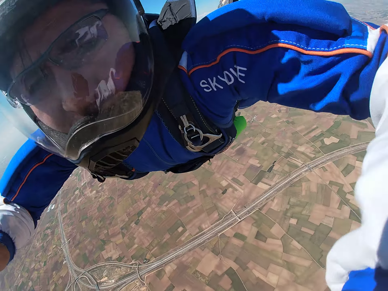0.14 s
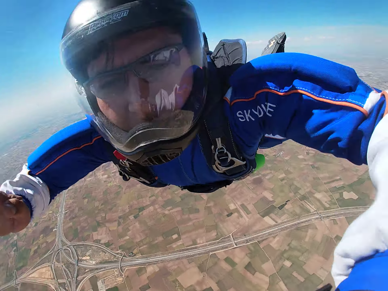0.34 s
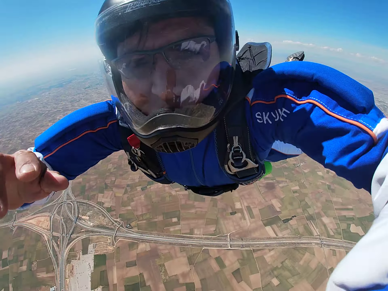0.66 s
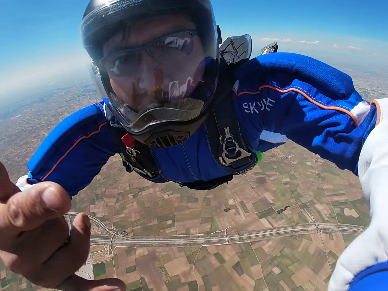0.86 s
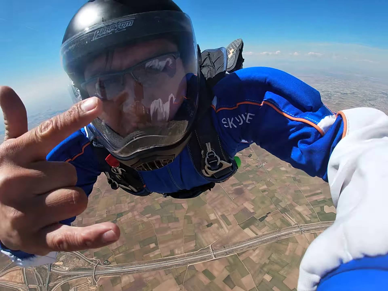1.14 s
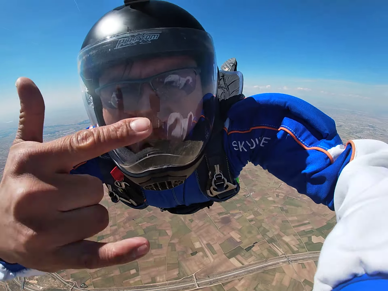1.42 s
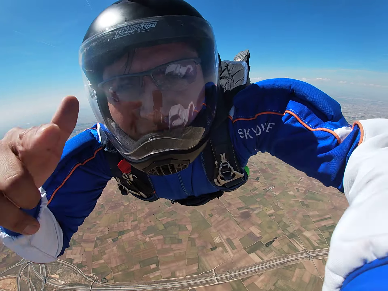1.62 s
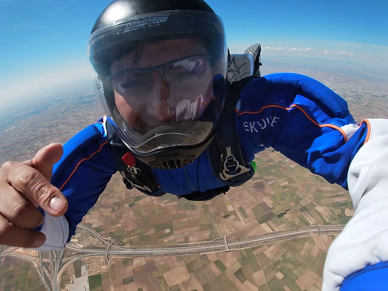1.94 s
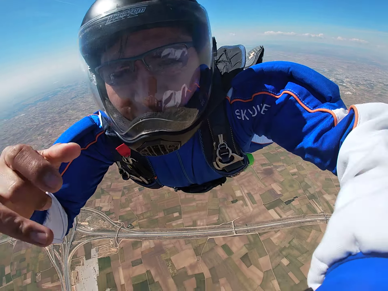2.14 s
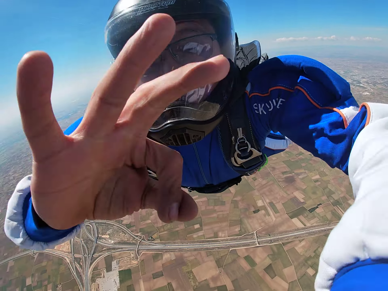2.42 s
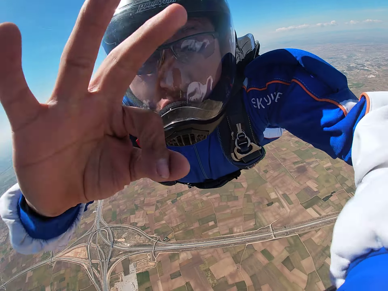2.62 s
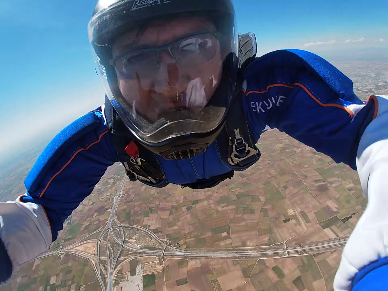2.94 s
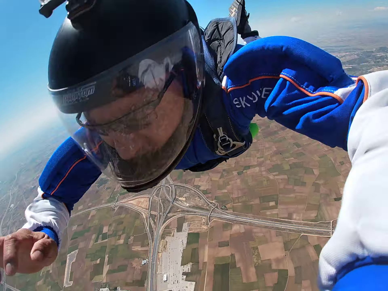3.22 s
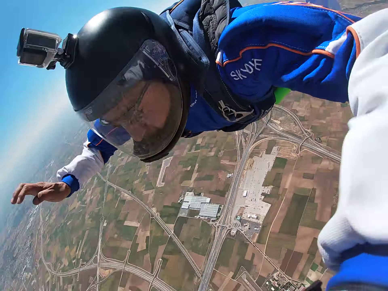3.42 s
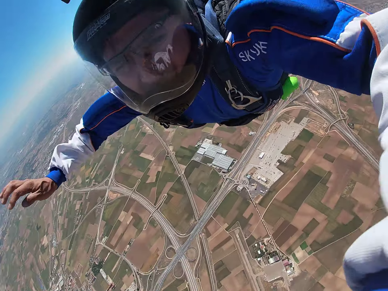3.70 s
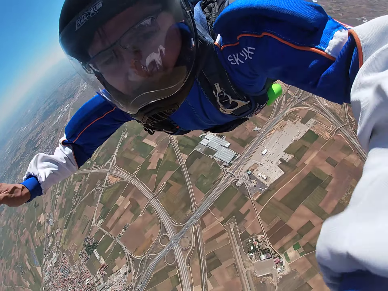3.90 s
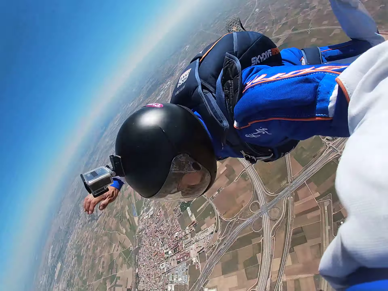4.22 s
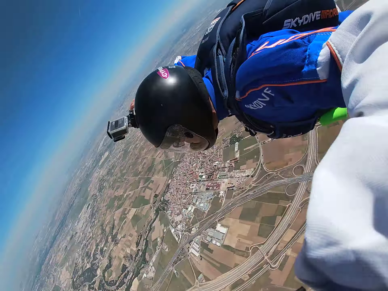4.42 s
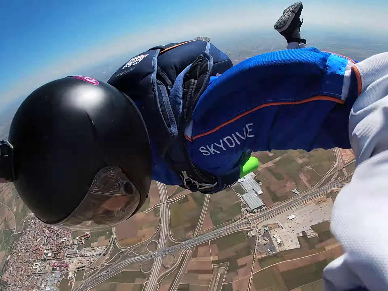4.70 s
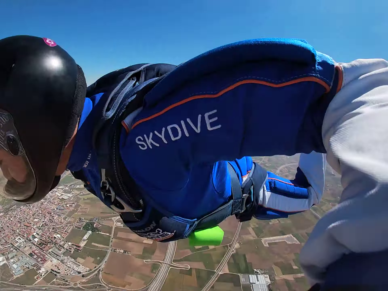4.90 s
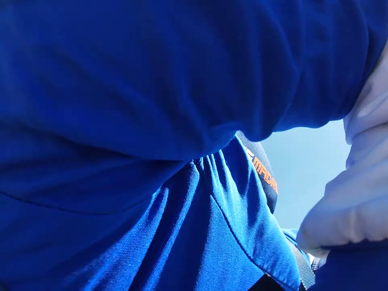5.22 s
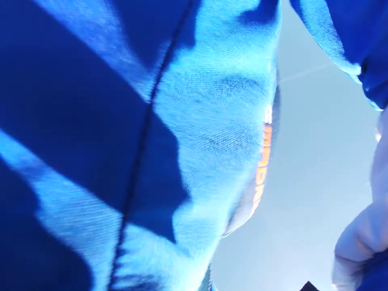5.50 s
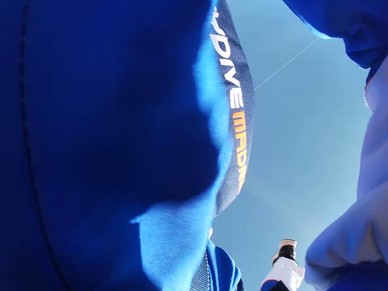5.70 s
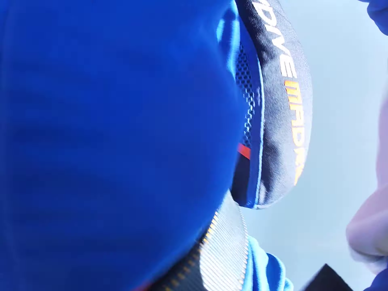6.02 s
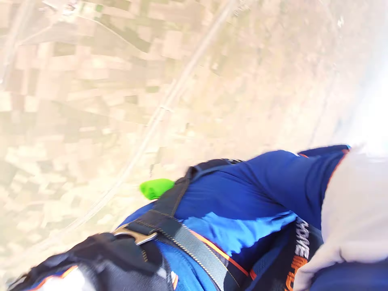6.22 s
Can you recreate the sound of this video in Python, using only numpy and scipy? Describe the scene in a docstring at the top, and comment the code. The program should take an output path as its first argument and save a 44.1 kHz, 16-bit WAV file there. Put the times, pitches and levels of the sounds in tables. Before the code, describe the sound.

Continuous loud freefall wind, close and without echo: deep thumping buffets, a mid roar and a thin hiss. Loose sleeve cloth whips beside the microphone in a rapid motor-like flutter, with clusters of snaps strongest in the first half. Later there are fewer and weaker snaps, the flutter dies, and dull, grainy gusts swell and ebb.

```python
"""Freefall, heard from a microphone worn on a skydiver's wrist.
From the start the airstream buffets the microphone: noise in bands, from slow heaves to fine hiss.
Right beside it a jumpsuit sleeve flutters about sixty times a second; each flap is a push of air
(low tones) and a rasp (bursts of noise), and many flaps add a snap, faint to hard.
Late on the body rolls over; then the flutter dies and a smoother, muffled surge of air swells and ebbs."""
import sys
import numpy as np
from scipy import signal
from scipy.fft import rfft, irfft
from scipy.io import wavfile
from scipy.ndimage import uniform_filter1d, minimum_filter1d

SR = 44100
rng = np.random.default_rng(int(sys.argv[2]) if len(sys.argv) > 2 else 0)


def generate_wav(sig):
    """Save sig (samples, or channels by samples) to the path in sys.argv[1] as 16-bit PCM at SR."""
    pcm = np.round(np.clip(np.atleast_2d(sig).T, -1, 1) * 32767).astype(np.int16)
    wavfile.write(sys.argv[1], SR, pcm)


N = 280029
TIME = np.arange(N) / SR

# pressure swing of the sleeve, before each tone's trim: t/s, fundamental level/dB, octave level/dB
THROB = [(0.0, -15.5, -45), (0.18, -30, -17.5), (0.4, -25.5, -24), (0.62, -14, -21.5), (0.78, -29, -37),
         (0.92, -17, -16.5), (1.1, -26, -27.5), (1.3, -29, -20), (1.45, -25, -24), (1.6, -23, -28),
         (1.77, -33, -33), (1.93, -19, -15.5), (2.1, -33, -40), (2.3, -18, -17.5), (2.42, -25, -25),
         (2.62, -19, -17.5), (2.78, -16.5, -25), (2.95, -20, -18), (3.15, -23, -14.5), (3.35, -15, -25),
         (3.47, -28, -35), (3.62, -19.5, -26.5), (3.76, -19, -19), (3.9, -13.5, -23), (4.05, -18, -25),
         (4.2, -24, -21.5), (4.35, -15, -28), (4.55, -16, -27), (4.92, -19.5, -23.5), (5.05, -29, -23)]
# flaps with an added snap, faint to hard, often several in a row: t/s (just ahead of the crest), level/dB
SNAPS = [(0.145, -30), (0.544, -26), (0.587, -30), (0.635, -24), (0.652, -29), (0.697, -19), (0.808, -24),
         (0.902, -23.5), (0.924, -23), (0.983, -30), (1.109, -23), (1.229, -20.5), (1.292, -19.5),
         (1.305, -23), (1.368, -18), (1.427, -28), (1.474, -24), (1.564, -25), (1.625, -27), (1.686, -17),
         (1.763, -20), (1.839, -20), (1.904, -16.5), (2.01, -24), (2.102, -19.5), (2.221, -16.5),
         (2.299, -17.5), (2.44, -23.5), (2.471, -22), (2.533, -23), (2.577, -27), (2.608, -21.5),
         (2.704, -27), (2.734, -19), (2.764, -17), (2.813, -23.5), (2.859, -22), (2.891, -18.5),
         (2.955, -24), (3.031, -28), (3.064, -25.5), (3.171, -25), (3.25, -23.5), (3.298, -23.5),
         (3.329, -23), (3.377, -19.5), (3.457, -23), (3.564, -33), (3.596, -25), (3.666, -21.5),
         (3.774, -28), (4.344, -34), (4.381, -30), (4.471, -42), (4.56, -37), (4.681, -30), (4.748, -27),
         (4.796, -21.5), (4.827, -24), (4.844, -24), (4.874, -26), (4.941, -29), (5.003, -37),
         (5.054, -28.5), (5.09, -38), (5.141, -41), (5.234, -21)]
SNAP_DELAY_S = 0.0032   # from the listed time of a snap to its crest
# spells of flapping, from loose to clean: start t/s, end t/s, pulsed share (0-1),
# unevenness/dB (before scaling)
SPELLS = [(-.04, 0.12, 0.7, 0), (0.5, 1.114, 0.83, 1), (1.114, 1.378, 0.75, 4.5), (1.386, 1.72, 0.91, 2.5),
          (1.722, 2.537, 0.8, 2.5), (2.544, 2.848, 0.92, 1.5), (2.849, 2.935, 0.55, 1.5),
          (2.926, 3.36, 0.89, 2), (3.36, 3.851, 0.76, 2.5), (4.197, 4.63, 0.98, 1), (4.631, 4.782, 0.8, 1),
          (4.778, 4.913, 0.6, 2.5), (4.911, 4.993, 0.6, 0.5), (4.998, 5.169, 0.92, 2.5)]


def from_db(db):
    """Decibels to gain."""
    return 10 ** (np.asarray(db) / 20)


def rms_one(x):
    """Scale to unit power."""
    return x / np.sqrt(np.mean(x ** 2) + 1e-20)


def in_time(rows):
    """Each column of a curve, at every sample."""
    s, *columns = np.transpose(rows)
    return [np.interp(TIME, s, column) for column in columns]


def bump(s, span_s):
    """A smooth swell of height 1 around time s, with half length span_s."""
    first, last = np.searchsorted(TIME, [s - span_s, s + span_s])
    out = np.zeros(N)
    out[first:last] = (1 - ((TIME[first:last] - s) / span_s) ** 2) ** 2
    return out


def coloured(x, spectrum):
    """Give a signal a spectrum, drawn in dB over log frequency; rms 1."""
    hz, db = np.transpose(spectrum)
    bins_hz = np.maximum(np.arange(N // 2 + 1) * SR / N, 1)
    gain_db = np.interp(np.log(bins_hz), np.log(hz), db, left=-80, right=-100)
    return rms_one(irfft(rfft(x) * from_db(gain_db), N))


def steadied(x, steady_s):
    """Even out the power over spans longer than steady_s; rms about 1."""
    span = max(int(steady_s * SR), 2)
    power = uniform_filter1d(uniform_filter1d(x ** 2, span), span)
    return x / np.sqrt(power + 1e-9)


def drift(rate_hz):
    """Chance wandering with a spread of 1, little of it faster than rate_hz."""
    bins_hz = np.arange(N // 2 + 1) * SR / N
    return rms_one(irfft(rfft(rng.standard_normal(N)) / (1 + (bins_hz / rate_hz) ** 4), N))


def turbulence(spectrum, steady_s):
    """Coloured noise whose power holds steady over spans longer than steady_s."""
    return steadied(coloured(rng.standard_normal(N), spectrum), steady_s)


def wind_level(law):
    """Level in dB of one size of turbulence, from the force of the wind and the roll of the body."""
    # force of the airstream at the wrist: t/s, level/dB
    wind = [(0.0, -1.5), (0.35, -2.5), (0.55, 1), (0.86, -1.5), (1.5, 0.5), (1.95, 3), (2.32, 2.5),
            (2.41, 0), (3.3, -1.5), (3.54, -6), (3.8, -1.5), (4.02, -5), (4.17, -9.5), (4.3, -9),
            (4.66, -8.5), (4.82, -4.5), (5.0, -7), (5.17, -7.5), (5.33, -2), (5.62, -3.5), (5.82, 2.5),
            (6.12, 2), (6.35, -4.5)]
    level_db, follows, rolled_db = law
    rolled = np.interp(TIME, [4.05, 4.75], [0, 1])   # the body rolls over
    return level_db + follows * in_time(wind)[0] + rolled_db * rolled


def airstream():
    """Levels in dB of buffet, roar, rush, rasp and hiss: the wind, with brief rises and falls."""
    # one law per size of eddy: level in a wind of 0 dB/dB, dB per dB of wind, gain after the roll/dB
    buffet_law = (-16.5, 0.15, -0.61)
    roar_law = (-23, 0.76, 4)
    rush_law = (-31, 1, 0.25)
    rasp_law = (-38.5, 1.05, 0.42)
    hiss_law = (-51.5, 0.92, -0.2)
    # brief rises and falls of level: t/s, half length/s, change of the roar/dB, of rush and rasp/dB
    level_changes = [(0.083, 0.028, 5.5, 0), (0.434, 0.062, 5, 1), (0.602, 0.072, 1.5, -4),
                     (0.853, 0.09, 0, -3.5), (0.92, 0.037, 4.5, 3), (0.977, 0.034, 5, 4),
                     (1.05, .045, -1.5, -2), (1.13, .035, 1.5, 5), (1.21, .04, 1.5, 3),
                     (1.267, .04, -0.5, -2), (1.355, 0.036, -1, 6), (1.628, 0.05, 3.5, 4.5),
                     (1.67, 0.032, 1, -5), (1.757, 0.078, 3, 0), (1.917, .06, 4, 3.5),
                     (2.034, 0.032, 1.5, 3.5), (2.175, .03, 3.5, 0), (2.267, 0.04, 2, 0),
                     (2.417, 0.043, 2.5, -5.5), (2.472, 0.071, 2.5, 1), (2.55, 0.048, 2.5, -4),
                     (2.686, 0.023, 1, -9), (2.76, 0.064, 2.5, 0.5), (2.878, .03, 3, 1.5),
                     (2.976, 0.053, 5.5, -4), (3.14, 0.022, 2, -3), (3.19, 0.081, 3, -1.5),
                     (3.285, 0.048, 2.5, 2), (3.426, 0.082, 0.5, 3.5), (3.517, 0.056, 3.5, 0.5),
                     (3.604, 0.031, 0, 2.5), (3.916, .04, 4, -0.5), (4.087, .04, -1.5, 3),
                     (4.166, 0.071, 2.5, 5), (4.38, .04, 3, -1), (4.638, 0.045, -0.5, -3),
                     (4.889, 0.021, 4, 1.5), (5.03, .03, -0.5, -4), (5.213, 0.04, 3.5, -1),
                     (5.328, 0.028, -5.5, -2.5), (5.467, 0.046, 3, -2), (5.702, 0.043, -1, 8),
                     (5.925, 0.088, 2.5, 1.5), (6.066, .03, 2.5, 1), (6.114, 0.022, 8, -1)]
    # brief thinnings of the sound: t/s, half length/s, bass change/dB, treble change/dB
    lulls = [(4.296, 0.089, 2, -10), (5.274, 0.039, 0.5, -14), (5.593, 0.11, -6.5, -3),
             (6.279, 0.1, -18, -8.5)]
    low_change = sum(db * bump(s, span_s) for s, span_s, db, _ in level_changes)
    high_change = sum(db * bump(s, span_s) for s, span_s, _, db in level_changes)
    bass_dip = sum(db * bump(s, span_s) for s, span_s, db, _ in lulls)
    treble_dip = sum(db * bump(s, span_s) for s, span_s, _, db in lulls)
    # the large eddies yield a little when the sleeve swings hard
    swing_db = in_time(THROB)[0]
    swing_db = swing_db - swing_db.mean()
    buffet_db = wind_level(buffet_law) + 0.79 * low_change + bass_dip - 0.17 * swing_db
    roar_db = wind_level(roar_law) + low_change + 0.18 * bass_dip - 0.027 * swing_db
    rush_db = wind_level(rush_law) + high_change + 0.7 * treble_dip
    rasp_db = wind_level(rasp_law) + high_change + treble_dip
    hiss_db = wind_level(hiss_law) + 0.81 * high_change + treble_dip
    return buffet_db, roar_db, rush_db, rasp_db, hiss_db


def heave():
    """The slowest, largest eddies rock the microphone at one level throughout."""
    # f/Hz, relative level/dB per Hz
    colour = [(10, -7), (20, -13), (36, 3), (55, 3), (75, -5), (150, -51.5)]
    return from_db(-23.5) * turbulence(colour, steady_s=0.41)


def buffet(level_db):
    """Large eddies thump against the microphone as low noise."""
    # f/Hz, relative level/dB per Hz
    colour = [(35, -27.5), (62, -3), (100, 5), (140, 0.5), (200, -1.5), (270, -10.5), (400, -18),
              (800, -69)]
    return from_db(level_db) * turbulence(colour, steady_s=0.045)


def surge():
    """A swell of grainy rush, muffled above an edge that slides by crossfading low-pass filters."""
    # t/s, level before muffling/dB, upper edge f/Hz
    swell = [(5.2, -49.5, 3000), (5.24, -26.5, 3140), (5.29, -32, 2200), (5.33, -54, 2340),
             (5.44, -34, 3400), (5.56, -26, 3400), (5.6, -28, 2000), (5.66, -26.5, 1900), (5.78, -36, 3000),
             (5.96, -27, 2900), (6.08, -39, 2820), (6.18, -24.5, 2800), (6.262, -38, 1900),
             (6.29, -22.5, 1840), (6.32, -23.5, 1860), (6.35, -21, 1350)]
    # f/Hz, relative level/dB per Hz
    colour = [(200, -17), (330, 7), (600, 6), (1100, 3.5), (1800, -3), (3000, -7), (7000, -40)]
    level_db, edge_hz = in_time(swell)
    grains = rng.standard_normal(N) * from_db(4.0 * drift(220))
    air = steadied(coloured(grains, colour), steady_s=0.012)
    stops_hz = np.geomspace(1200, 3600, 11)
    out = 0
    for hz, row in zip(stops_hz, np.eye(len(stops_hz))):
        muffled = signal.sosfiltfilt(signal.butter(12, hz, fs=SR, output="sos"), air)
        out = out + np.interp(edge_hz, stops_hz, row) * muffled
    return from_db(level_db) * out


def torn_air(spectrum, flaps, share, grain_db, steady_s):
    """Turbulence in part smooth, in part torn by the flapping cloth into bursts of grains."""
    share = np.clip(share, 0, .995)
    grains = rms_one(from_db(grain_db * drift(610)))
    strength = np.sqrt(1 - share + share * flaps * grains ** 2)
    return steadied(coloured(rng.standard_normal(N) * strength, spectrum), steady_s)


def roar(level_db, flaps, pulsed):
    """Middling eddies roar; about half of the sleeve's pulsing reaches them."""
    # f/Hz, relative level/dB per Hz
    colour = [(130, -27), (220, 2.5), (300, 0.5), (420, -2), (600, -8.5), (850, -19), (1400, -34),
              (3000, -68.5)]
    return from_db(level_db) * torn_air(colour, flaps, 0.55 * pulsed, grain_db=4.0, steady_s=0.066)


def rush(level_db, flaps, pulsed):
    """Smaller eddies rush past, pulsed by the flapping."""
    # f/Hz, relative level/dB per Hz
    colour = [(250, -22.5), (500, 0.5), (800, 4), (1200, -0.5), (1800, -5.5), (2100, -18), (2800, -46),
              (5000, -71.5)]
    return from_db(level_db) * torn_air(colour, flaps, pulsed, grain_db=3.0, steady_s=0.025)


def hiss(level_db, flaps, pulsed):
    """The finest eddies hiss, in separate slaps only when the flutter is at its cleanest."""
    # f/Hz, relative level/dB per Hz
    colour = [(2000, -44.5), (3000, -13.5), (3600, -2.5), (4200, -4), (5000, -6), (6300, -14.5),
              (8000, -24.5), (10000, -32), (12500, -46)]
    flicker_db = 1.3 * drift(23)
    air = torn_air(colour, flaps, pulsed ** 7.0, grain_db=4.5, steady_s=0.13)
    return from_db(level_db + flicker_db) * air


def rasp(level_db, flaps, pulsed):
    """The cloth rasps in coarse-grained bursts, one a flap."""
    # f/Hz, relative level/dB per Hz
    colour = [(1000, -38.5), (1700, -7), (2050, -2), (3000, -7), (3500, -10), (4200, -18), (5000, -28.5),
              (8000, -62)]
    return from_db(level_db) * torn_air(colour, flaps, pulsed, grain_db=5.5, steady_s=0.03)


def slack():
    """Gain of the finer turbulence: it dips while the cloth hangs loose before a snap."""
    return from_db(-2 * sum(bump(s - 0.003, 0.0069) for s, _ in SNAPS))


def over_spells(inside, outside):
    """A quantity at every sample: one value in each spell, another between them."""
    fade_s = 0.018   # time a spell takes to set in
    out = outside
    for (start, end, _, _), value in zip(SPELLS, inside):
        within_s = np.minimum(TIME - start, end - TIME)
        out = out + (value - outside) * np.clip(.5 + within_s / fade_s, 0, 1)
    return out


def pulsed_share():
    """How much of the rush comes in flaps: over half of it during a spell, little otherwise."""
    return np.clip(over_spells([share for _, _, share, _ in SPELLS], 0.098), 0, 1)


def flap_spread():
    """How unevenly the sleeve flaps, in dB before scaling: most of all between the spells."""
    return over_spells([db for _, _, _, db in SPELLS], 11)


def flap_turns():
    """Flaps counted since the start, pulled so that every snap crests on a whole turn."""
    # sleeve flutter before that pull: t/s, flap rate f/Hz
    flap_rate = [(0.0, 64.6), (0.16, 61), (0.48, 63.8), (0.96, 62.8), (1.04, 65.4), (1.84, 65.6),
                 (1.92, 63.6), (2.08, 65.6), (2.56, 64.8), (2.88, 76), (3.12, 65.5), (3.2, 61.8),
                 (3.28, 64.9), (3.52, 58.1), (3.76, 55.4), (3.92, 63), (4.16, 60), (4.24, 48.6),
                 (4.48, 56.4), (4.96, 64.2), (5.04, 54.1), (5.12, 63), (5.3, 54)]
    rate_hz, = in_time(flap_rate)
    turns = np.cumsum(rate_hz) / SR
    crests_s = np.array(SNAPS)[:, 0] + SNAP_DELAY_S
    ahead = np.unwrap(np.interp(crests_s, TIME, turns) % 1, period=1)
    return turns - np.interp(TIME, crests_s, ahead)


def flap_power(turns, rise, fall, uneven):
    """Power, mean 1, of the cloth whipping round once a cycle in bursts; the shorter, the higher."""
    squareness = 2.8   # 2 is a rounded burst, more is squarer
    whole = np.floor(turns + .4).astype(int) + 2
    since = turns + 2 - whole   # in cycles from the crest
    chance = 2 * rng.random((whole.max() + 2, 2))[whole] - 1   # a new pair for each flap
    stretch = 1 + 0.74 * chance[:, 1]
    strength = from_db(uneven * flap_spread() * chance[:, 0]) / np.sqrt(stretch)
    length = np.where(since < 0, rise, fall) * stretch
    return rms_one(strength * np.exp(-np.abs(since / length) ** squareness)) ** 2


def snaps():
    """Many flaps add a snap of a few milliseconds, faint to hard, often several in a row."""
    # f/Hz, relative level/dB per Hz
    colour = [(200, -10.5), (480, 17), (900, 7.5), (2000, -0.5), (3200, -11), (5000, -24.5), (8000, -50),
              (12500, -72.5)]
    bursts = sum(from_db(db) * bump(s + SNAP_DELAY_S, 0.005) for s, db in SNAPS)
    return bursts * turbulence(colour, steady_s=0.0017)


def throb(turns):
    """The swinging cloth pushes air at the flap rate and, less steadily, at two and three times it."""
    lead = .33   # cycles by which the push comes before a whole turn
    low_db, octave_db = in_time(THROB)
    alive = np.interp(TIME, [5.15, 5.3], [1, 0])   # the flutter dies
    levels_db = [low_db + 1.1, octave_db + 1.1, octave_db - 15.0]
    out = 0
    for k, db in enumerate(levels_db, 1):
        swing = np.cos(2 * np.pi * k * (turns + lead + 0.02 * k * drift(4.8)))
        waver_db = 0.4 * k * drift(15)
        out = out + np.sqrt(2) * from_db(db + waver_db) * swing
    return alive * out


def scene():
    """Eddies of every size and the fluttering sleeve, all right at the microphone."""
    buffet_db, roar_db, rush_db, rasp_db, hiss_db = airstream()
    pulsed = pulsed_share()
    turns = flap_turns()
    # the loose edge whips a little early or late
    hem = turns + 0.06 + 0.0061 * flap_spread() * drift(33)
    dull_flaps = flap_power(hem, rise=0.15, fall=0.30, uneven=0.7)
    bright_flaps = flap_power(hem, rise=0.14, fall=0.29, uneven=0.7)
    fine = roar(roar_db, dull_flaps, pulsed) + rush(rush_db, dull_flaps, pulsed)
    fine = fine + hiss(hiss_db, bright_flaps, pulsed) + rasp(rasp_db, bright_flaps, pulsed)
    background = heave() + buffet(buffet_db) + surge()
    return (background + slack() * fine + snaps() + throb(turns))[None]


def limiter(x, ceiling_db, hold_s):
    """Turn the gain down smoothly around every peak that would pass the ceiling."""
    span = max(int(hold_s * SR), 2)
    allowed = np.minimum(1, from_db(ceiling_db) / (np.abs(x) + 1e-9))
    return x * uniform_filter1d(minimum_filter1d(allowed, span), span)


def record(dry):
    """The sound sets in softly over the first 3 ms; the microphone's chain limits the peaks and cuts the top."""
    opening = np.sin(np.pi / 2 * np.minimum(TIME / .003, 1)) ** 2
    held = limiter(dry * opening, ceiling_db=-3.5, hold_s=0.008)
    # 70 dB down from 12 kHz upwards
    return signal.sosfilt(signal.cheby2(12, 70, 12000, fs=SR, output="sos"), held)


dry = scene()
out = record(dry)
generate_wav(out)
```